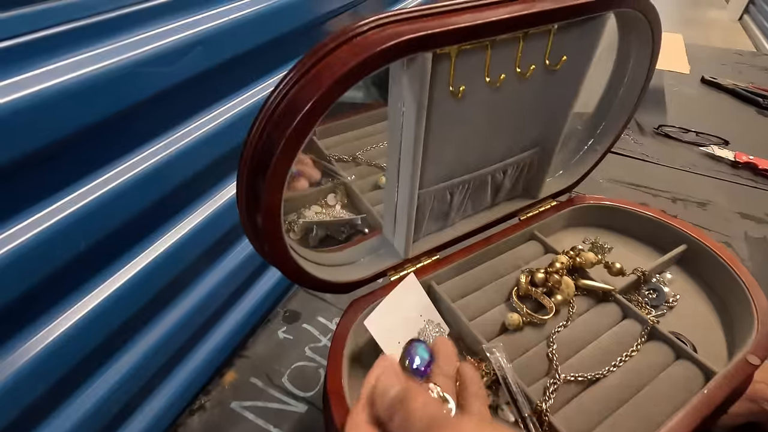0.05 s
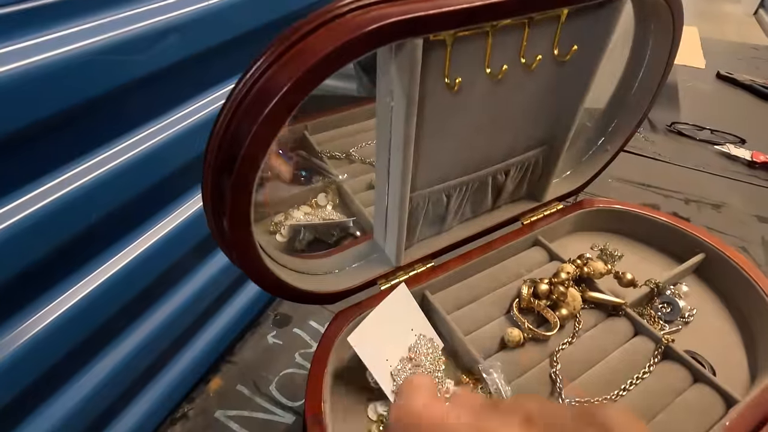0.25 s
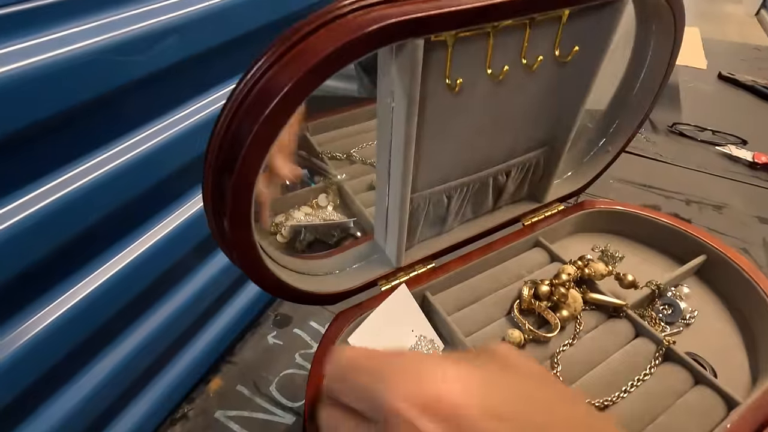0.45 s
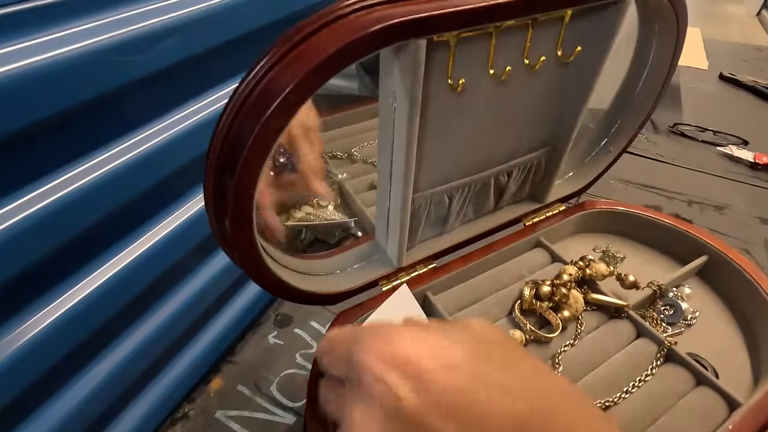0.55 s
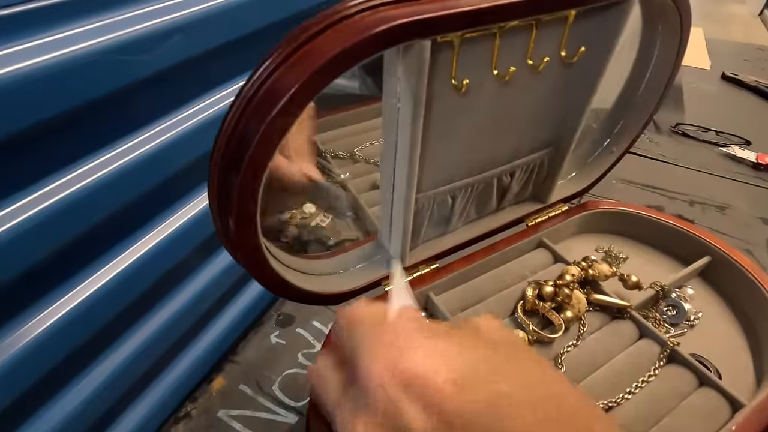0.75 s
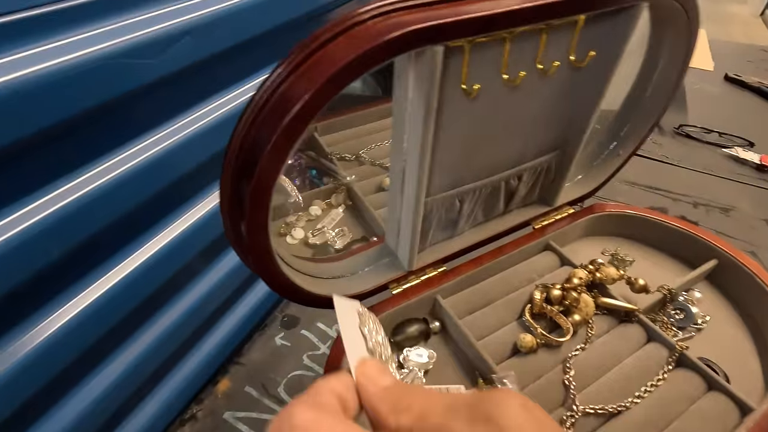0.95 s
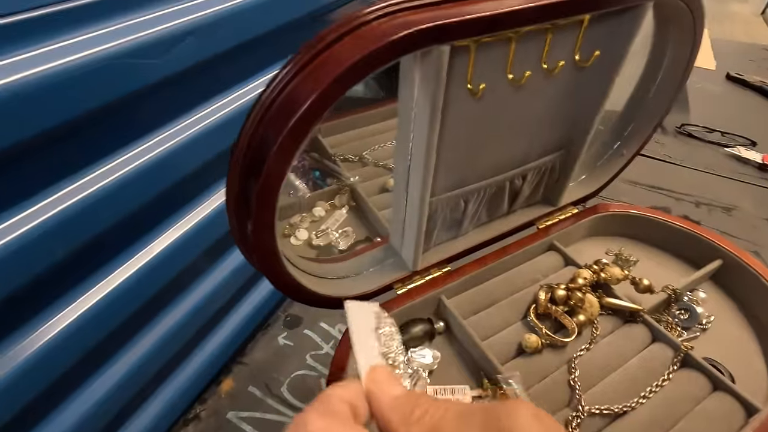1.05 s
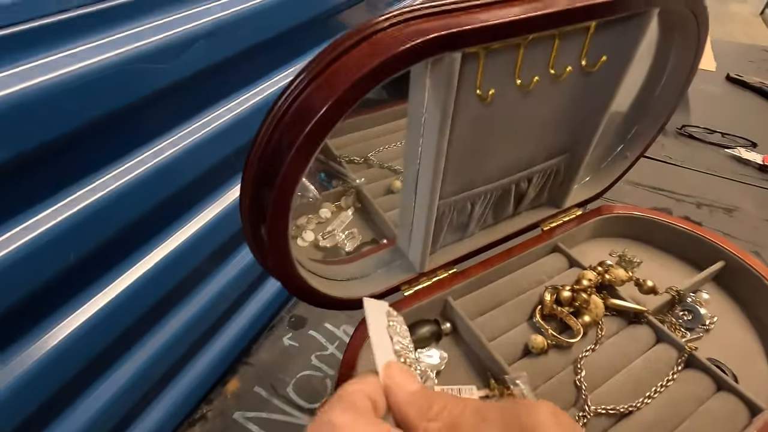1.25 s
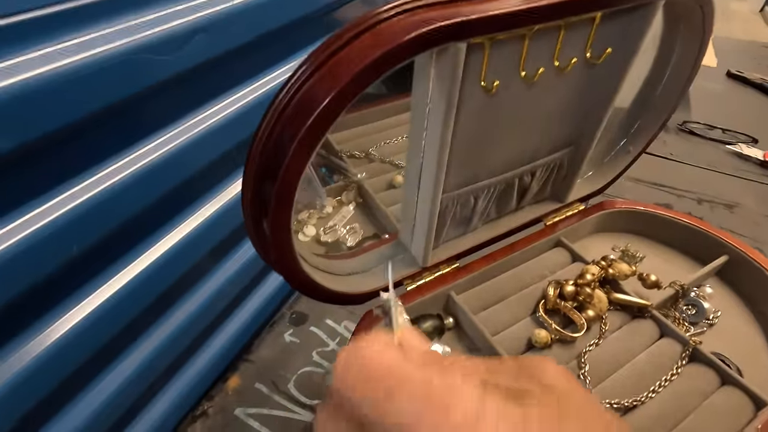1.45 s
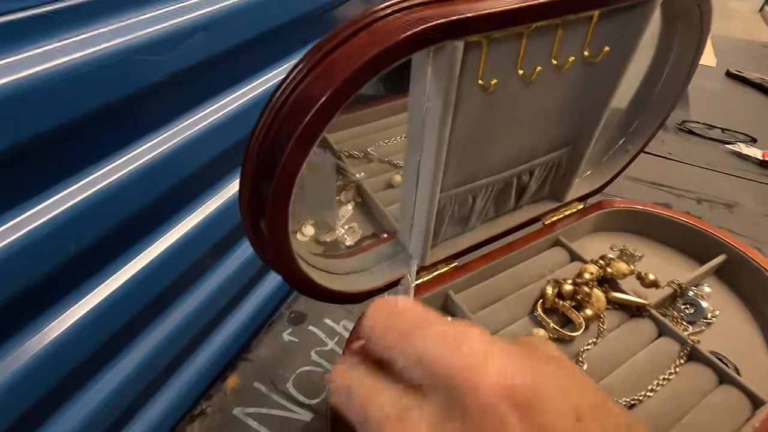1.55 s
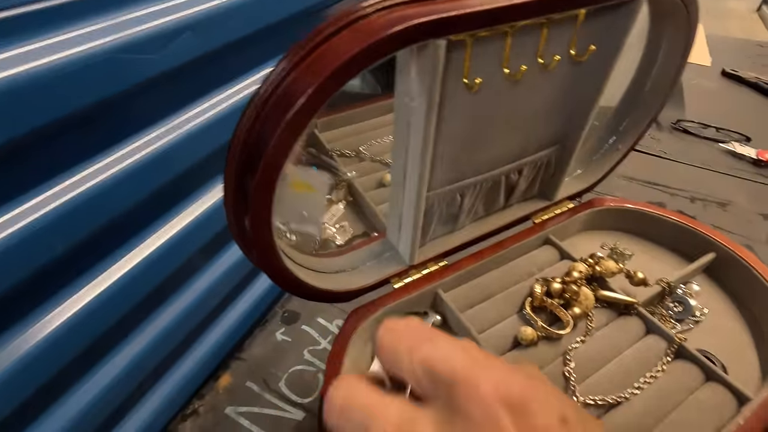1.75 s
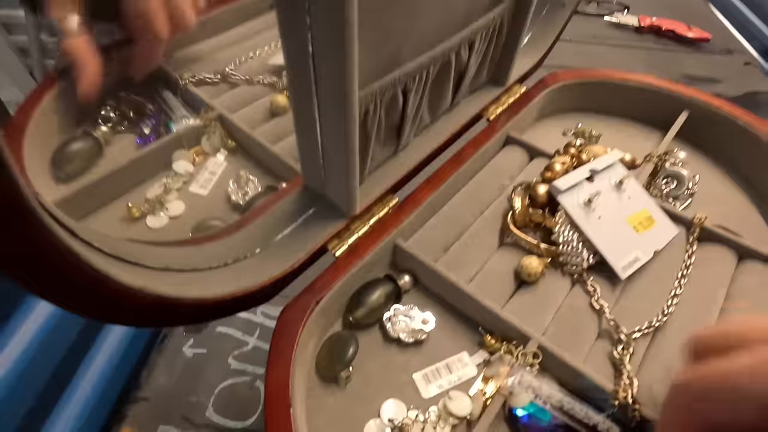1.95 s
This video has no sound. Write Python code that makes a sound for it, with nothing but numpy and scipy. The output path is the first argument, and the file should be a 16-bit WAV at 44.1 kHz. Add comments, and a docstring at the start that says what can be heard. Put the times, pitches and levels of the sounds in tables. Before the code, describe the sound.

Small beads, earrings and fine chains clatter and trickle against a wooden box, then quieten to faint scrapes

```python
"""In a small dry room, a hand sorts costume jewelry in a wooden box close to the microphone.
Knocks ring the box modes and a noise rattle; beads and earrings click as noise ticks with short rings.
Fine chain trickles as a swarm of link pings; filtered noise is the hand brushing the box.
An earring card scrapes along a divider in tiny slips with a thin rubbing note.
A faint low hum swells under the quiet air of the room, and a faint thin tone joins it."""
import sys
import numpy as np
from scipy import signal
from scipy.fft import rfft, irfft
from scipy.io import wavfile
from scipy.ndimage import uniform_filter1d

SR = 44100
rng = np.random.default_rng(int(sys.argv[2]) if len(sys.argv) > 2 else 0)


def pcm_store(signal):
    """Save signal as 16-bit PCM."""
    levels = np.round(np.clip(np.atleast_2d(signal), -1, 1) * 32767)
    wavfile.write(sys.argv[1], SR, levels.astype(np.int16).T)


N = 88200  # two seconds
TOP_HZ = 16000  # upper limit of the link pitches and of the whole sound

# Modes of the box and its tray. Each row: frequency in Hz, level in dB, t60 in seconds.
BOX_MODES = [(83, -31, 0.044), (101.6, -19.5, 0.24), (163.2, -16, 0.27), (193.2, -17.5, .27),
             (238, -20, .13), (324, -8.5, 0.066), (374.6, -17, 0.13), (451, -7, 0.052), (499.3, -4.5, 0.16),
             (518.7, -10, 0.058), (628, -5.5, 0.04), (873, -7, 0.055), (1168, 1, 0.033),
             (1267, -5.5, 0.023), (1750, -4, 0.0306), (2035, -1, .014)]


def undb(db):
    """Decibels to gain."""
    return 10 ** (np.asarray(db) / 20)


def unit(x):
    """Scale to rms 1."""
    return x / np.sqrt(np.mean(x ** 2))


def fade(rows):
    """Gain over time from (s, dB) points."""
    times, db = np.array(rows).T
    return undb(np.interp(np.arange(N) / SR, times, db))


def at(points, hz):
    """Read (Hz, dB) points on a log-frequency axis."""
    f, db = np.array(points).T
    return np.interp(np.log(hz), np.log(f), db)


def bins(x):
    """Frequencies of a sound's spectrum, kept at 1 Hz or more for the logarithms."""
    return np.maximum(np.fft.rfftfreq(x.shape[-1], 1 / SR), 1)


def shape(x, db):
    """Minimum-phase filter with the given gain at each frequency."""
    size = x.shape[-1]
    cepstrum = irfft(np.log(undb(db)), size)
    # folding the cepstrum forward makes the filter causal
    cepstrum[1:size // 2] *= 2
    cepstrum[size // 2 + 1:] = 0
    return irfft(rfft(x) * np.exp(rfft(cepstrum)), size)


def colour(x, points):
    """Filter by (Hz, dB) points."""
    return shape(x, at(points, bins(x)))


def decay(t, t60):
    """Exponential fall of 60 dB in t60 seconds."""
    return np.exp(-np.log(1000) * t / t60)


def burst(t, t60, db):
    """Coloured noise with the energy of a decay that starts at 1."""
    env = decay(t, t60)
    noise = shape(rng.standard_normal(len(t)) * env, db)
    return unit(noise) * np.sqrt(np.mean(env ** 2))


def add(out, start_s, x):
    """Mix a sound in at its time."""
    i = max(int(start_s * SR), 0)
    out[..., i:i + x.shape[-1]] += x[..., :N - i]


def walk(rate):
    """Random drift of rms 1, smoothed twice over 1 / rate seconds."""
    k = int(SR / rate)
    smooth = uniform_filter1d(rng.standard_normal(N), k)
    return unit(uniform_filter1d(smooth, k))


def contacts(per_s, scatter_db):
    """Random tiny impacts of uneven size and either sign, rms 1."""
    size = undb(scatter_db * np.minimum(rng.exponential(size=N), 4))
    hits = rng.random(N) < per_s / SR
    return unit(hits * size * rng.choice([-1, 1], N))


def ports(mid, side):
    """Two microphone ports: a shared sound plus a separately drawn one, opposite in sign at each."""
    # Level of the opposed part at each frequency. Each row: frequency in Hz, gain in dB.
    opposed_gain = [(130, -23.5), (260, -11.5), (1000, -12), (2500, -6.5), (5000, -9), (8500, -20.5),
                    (12000, -4)]
    return mid + colour(side, opposed_gain) * np.array([[1], [-1]])


def background():
    """Coloured noise as room air, a low sine hum that wavers in pitch and level, a faint steady-pitched tone."""
    # Room air. Each row: frequency in Hz, density in dB per Hz.
    air_spectrum = [(15, -9.5), (27, 5.5), (55, -8.5), (90, -10), (170, -15), (300, -24.5), (600, -31.5),
                    (1500, -34.5), (2400, -50), (7300, -53), (15000, -67.5)]
    # Low hum. Each row: time in seconds, level in dB.
    hum_level = [(0, -84), (1.0, -69.5), (1.13, -59.5), (1.25, -53), (1.45, -53.5), (1.62, -63.5),
                 (1.70, -57), (1.93, -55.5), (2, -76)]
    # Faint thin tone. Each row: time in seconds, level in dB.
    tone_level = [(1.08, -100), (1.155, -71.5), (1.24, -76.5), (1.42, -94)]
    hum_hz, tone_hz = 79.8, 513  # the hum's centre, the tone's pitch
    waver, flutter_db = .08, 2  # rms drift: share of the hum's pitch, dB of its level
    air_db, side_db = -61, -5  # the opposed part is set against the shared part

    wandering_hz = hum_hz * (1 + waver * walk(40))
    hum = np.sin(2 * np.pi * np.cumsum(wandering_hz) / SR) * undb(flutter_db * walk(35))
    tone = np.sin(2 * np.pi * tone_hz * np.arange(N) / SR)
    mid, side = (unit(colour(rng.standard_normal(N), air_spectrum)) for _ in range(2))
    air = undb(air_db) * (mid + undb(side_db) * side * np.array([[1], [-1]]))
    return air + unit(hum) * fade(hum_level) + unit(tone) * fade(tone_level)


def links():
    """Tiny links of all sizes ping as decaying sines and scrape as random impacts."""
    # Chain links. Each row: frequency in Hz, gain in dB per Hz.
    link_spectrum = [(200, -16.5), (850, -14.5), (1250, 2), (2500, 1), (5000, -1.5), (8600, -2),
                     (9800, -14), (12500, -16), (15500, -39)]
    links_per_s, scatter_db = 3400, 3.5
    ping_t60_s, scrape_db = 0.0069, -1.5  # scrape level against the pings

    t = np.arange(SR // 100) / SR
    when, pitch, size = rng.random((int(links_per_s * N / SR), 3)).T[:, :, None]
    strength = undb(scatter_db * np.minimum(-np.log(size), 4))
    pings = strength * np.sin(2 * np.pi * TOP_HZ * pitch * t) * decay(t, ping_t60_s)
    # sum every ping at its own moment
    places = (when * N).astype(int) + np.arange(len(t))
    pings = np.bincount(places.ravel(), pings.ravel(), N)[:N]
    scrape = undb(scrape_db) * contacts(links_per_s, scatter_db)
    return unit(colour(unit(pings) + scrape, link_spectrum))


def chains():
    """The chains trickle in quick little surges while the fingers stir them."""
    # Stirring of the chains. Each row: time in seconds, level in dB.
    stir = [(0, -71), (.14, -76), (.16, -71.5), (.23, -74), (.31, -52), (.345, -37.5), (.385, -50.5),
            (.46, -62.5), (.53, -68), (.56, -67), (.612, -76), (.63, -34), (.65, -45.5), (.67, -35),
            (.70, -45.5), (.735, -37.5), (.765, -53), (.86, -59.5), (.91, -56), (.99, -66.5),
            (1.035, -53.5), (1.07, -66), (1.16, -84.5), (1.44, -90), (1.51, -76), (1.645, -78), (1.67, -63),
            (1.73, -62), (1.815, -53), (1.87, -62.5), (1.94, -72), (2, -64.5)]
    surge_db, surges_per_s = 1.6, 220  # rms depth, smoothing rate
    surge = unit(undb(surge_db * walk(surges_per_s)))
    return ports(links(), links()) * surge * fade(stir)


def beads():
    """Each small hard contact is a noise tick and the short ring of three close modes."""
    # Clicks of beads, earrings and card edges. Each row: start in seconds, tick level in dB,
    # treble tilt in dB per octave, ring frequency in Hz, ring level in dB, tick t60 in seconds.
    clicks = [(0.073, -50.5, -2, 5160, -57, 0.012), (0.0912, -50.5, 11.5, 6550, -52, 0.018),
              (0.2476, -25.5, 1, 6720, -29, 0.013), (.2785, -30.5, -4, 7330, -33, 0.019),
              (0.3138, -19.5, -1, 3790, -25, 0.0096), (0.3148, -27, -19, 5900, -21, 0.023),
              (0.324, -36, -19, 6550, -43, 0.015), (0.335, -31, -9.5, 2560, -41.5, 0.0098),
              (0.3452, -21, 3, 6840, -28, 0.011), (0.3525, -25, -6.5, 3640, -31, 0.007),
              (0.354, -22.5, -16, 1615, -21.5, 0.023), (0.369, -33, 3, 3730, -37, 0.014),
              (0.3752, -28, 1, 4880, -34, 0.0098), (.3790, -35, 7, 3600, -38, 0.01),
              (0.388, -37, -2, 4860, -36, 0.011), (0.3982, -24.5, 2.5, 7380, -29, 0.01),
              (0.4135, -30, -0.5, 7100, -47, 0.0092), (0.425, -26.5, -7, 2710, -30, 0.013),
              (.4258, -52, 1, 4910, -29, 0.011), (0.4323, -40, -2, 1643, -32, 0.014),
              (0.444, -49, 4, 6700, -56, 0.0097), (0.4718, -23, -1, 4840, -25.5, 0.0092),
              (0.4858, -45.5, -7, 4940, -56, 0.013), (0.544, -54, -8, 1734, -53, .04),
              (0.6199, -46, -7, 5860, -51, .01), (0.6259, -33.5, -3.5, 3920, -28, 0.051),
              (0.6317, -46, -13, 1420, -33.5, 0.022), (.6605, -46, 8, 1500, -37, .012),
              (0.6643, -22.5, 0, 2640, -23.5, 0.0075), (.6660, -28.5, 20, 1284, -28, 0.026),
              (0.6721, -34, -6, 1428, -22.5, 0.014), (0.679, -35, -6, 5950, -36, 0.012),
              (0.6903, -31.5, -10, 1460, -28, 0.058), (0.7005, -34.5, -12, 1300, -26, 0.097),
              (0.713, -43, 1.5, 7800, -30.5, 0.012), (0.718, -28.5, 2.5, 5350, -42, 0.028),
              (0.7233, -34.5, -13, 7650, -22, 0.039), (0.7353, -19.5, -3.5, 7130, -22, 0.012),
              (0.7386, -36.5, -25.5, 3500, -26.5, 0.024), (0.7463, -35, 3.5, 7440, -27.5, 0.0075),
              (0.789, -36.5, -7, 7975, -28.5, 0.011), (0.7917, -38, 6, 8080, -26, 0.017),
              (.7990, -30, 0.5, 8000, -37, 0.007), (.8245, -44, 0.5, 6610, -47, .01),
              (0.835, -38, 3.5, 5410, -37.5, 0.026), (0.851, -44.5, -2, 5870, -41, 0.022),
              (.870, -47.5, -7, 5140, -48, 0.042), (0.8912, -38, 1.5, 6040, -41, 0.024),
              (0.896, -40, 3, 5330, -40, 0.016), (1.0005, -52, 9, 4370, -47.5, 0.015),
              (1.0128, -51.5, -1.5, 3880, -44, 0.027), (1.0202, -44, -3, 5900, -52, 0.0085),
              (1.0249, -42, -9.5, 4870, -43, 0.018), (1.035, -41.5, 1.5, 5420, -51, 0.013),
              (1.0454, -44, 1.5, 7660, -61, 0.021), (1.052, -43, -5.5, 6120, -45, 0.017),
              (1.0874, -51.5, 1, 4700, -55, 0.022), (1.5003, -55.5, -10, 5000, -69.5, .02),
              (1.518, -57.5, 2, 6500, -57.5, 0.014), (1.6579, -41.5, 8.5, 5450, -42.5, 0.023),
              (1.681, -53, -5, 1390, -46.5, 0.014), (1.7032, -47.5, 2, 1410, -43.5, 0.015),
              (1.716, -43.5, 4, 1490, -41.5, 0.059), (1.7401, -41, -0.5, 2200, -34.5, 0.007),
              (1.7659, -39.5, 3, 3190, -36.5, 0.022), (1.797, -37.5, 10, 6200, -46, 0.0089),
              (1.802, -41, 3, 1190, -50, 0.0085), (1.8135, -50, 6, 1413, -34, 0.011),
              (1.814, -38, -4, 2020, -40, 0.011), (1.8211, -40.5, -13, 1063, -38.5, 0.018),
              (1.8502, -46.5, -9.5, 1260, -59, 0.019), (1.8830, -48.5, -16, 1420, -73, 0.034),
              (1.898, -56, 3, 3170, -52, 0.0097), (1.907, -50.5, -11, 1100, -52.5, 0.027)]
    # Contact tick of small hard pieces. Each row: frequency in Hz, density in dB per Hz.
    tick_spectrum = [(200, -25.5), (800, -12.5), (1400, -8.5), (2500, 1), (5000, 6.5), (8500, 3.5),
                     (9800, -10.5), (12500, -17.5), (15500, -34)]
    tilt_hz, spread = 4560, 0.054  # pivot of the tilt, typical mode spacing as a share of the ring pitch
    ring_cycles, ring_min_s = 20, 0.013  # ring t60: this many cycles on top of the minimum
    rise_share = .035  # rise time constant as a share of the tick t60

    out, t = np.zeros((2, N)), np.arange(SR // 10) / SR
    f = bins(t)
    octaves = np.clip(np.log2(f / tilt_hz), -2, 1)
    for start, tick_db, tilt_db, ring_hz, ring_db, t60 in clicks:
        spectrum = at(tick_spectrum, f) + tilt_db * octaves
        tick = ports(*(burst(t, t60, spectrum) for _ in range(2)))
        hz = ring_hz * (1 + spread * np.array([-1, 0, 1]) * rng.uniform(0.45, 1.6, size=3))
        modes = np.array([.5, 1, .5]) @ np.sin(2 * np.pi * hz[:, None] * t)
        ring = modes * decay(t, ring_min_s + ring_cycles / ring_hz)
        rise = 1 - np.exp(-t / (rise_share * t60))  # longer ticks also rise more slowly
        add(out, start, (undb(tick_db) * tick + undb(ring_db) * ring) * rise)
    return out


def box():
    """Each knock rings the box and shakes its contents; soft contacts lose the high modes."""
    # Knocks on the box. Each row: start in seconds, level in dB, contact cut-off in Hz,
    # bass boost in dB, centre of the boost in Hz.
    knocks = [(.2258, -47.5, 1980, 12.5, 91.2), (.2365, -34, 2010, 1, 90), (.2474, -14, 2620, -9.5, 125),
              (.2745, -26, 1480, -4.5, 89.7), (.2795, -24.5, 1710, 10, 162.5), (.3150, -32, 600, 11, 95.2),
              (.3245, -31, 298, 15.5, 160), (.3540, -30, 2450, 13.5, 166), (.3650, -36, 450, 7, 95),
              (.3990, -34, 600, 6.5, 100), (.4308, -22, 540, 2.5, 212.7), (.6640, -42, 1470, 1.5, 100),
              (0.7104, -29, 550, 8, 217), (.7370, -37.5, 750, 11.5, 200), (.7640, -40, 557, 13, 200),
              (1.206, -65, 1405, -12.5, 90.1), (1.768, -42, 196, 6.5, 177), (1.815, -45, 175, 10.5, 161),
              (1.958, -58, 600, 28, 120)]
    # Rattle of the contents under a knock. Each row: frequency in Hz, density in dB per Hz.
    thud = [(40, -6.5), (100, -5.5), (300, 0), (700, 9), (1300, -2), (2100, -13.5), (2700, -20),
            (6000, -48.5)]
    bass_octaves, contact_slope = 0.44, 7.9  # half width of the boost, exponent of the cut-off
    thud_db, thud_t60_s = -6.5, 0.061
    grip_detune, strike_scatter_db = .012, 1.2  # rms share of pitch, rms dB per mode

    out, t = np.zeros((2, N)), np.arange(SR // 2) / SR
    f = bins(t)
    hz, db, t60 = np.array(BOX_MODES).T
    sign = (-1) ** (np.arange(len(hz)) // 2)  # pairs of modes swing against each other

    def push_db(at_hz, contact_hz, bass_db, bass_hz):
        """Spectrum of the push: a bass boost and the softness of the contact."""
        boost = bass_db / (1 + (np.log2(at_hz / bass_hz) / bass_octaves) ** 2)
        return boost - 10 * np.log10(1 + (at_hz / contact_hz) ** contact_slope)

    for start, level_db, *push in knocks:
        # grip shifts the modes, the spot struck changes their levels
        grip, spot = rng.standard_normal((2, len(hz)))
        mode_hz = hz * (1 + grip_detune * grip)
        rings = np.sin(2 * np.pi * mode_hz[:, None] * t) * decay(t, t60[:, None])
        strength = sign * undb(db + push_db(hz, *push) + strike_scatter_db * spot)
        rattle = ports(*(burst(t, thud_t60_s, at(thud, f)) for _ in range(2)))
        rattle = shape(rattle, push_db(f, *push))
        add(out, start, undb(level_db) * (strength @ rings + undb(thud_db) * rattle))
    return out


def hand():
    """The hand rubs the box: noise through its damped modes keeps the low ones rumbling."""
    # Hand bumping and brushing along the box. Each row: time in seconds, level in dB.
    brush = [(.245, -95), (.27, -41), (.335, -31), (.39, -42.5), (.42, -48.5), (.50, -51), (.53, -61),
             (.55, -55.5), (.60, -62), (.66, -45.5), (.73, -46.5), (.80, -50.5), (.86, -62), (.95, -63),
             (1.1, -75), (1.3, -92), (1.5, -73.5), (1.7, -74), (1.85, -66.5), (1.93, -65.5), (2, -54)]
    # Rubbing force. Each row: frequency in Hz, gain in dB per Hz.
    rub_force = [(30, -4.5), (100, 6.5), (165, 2.5), (230, -3.5), (330, -10.5), (500, -17.5), (900, -25),
                 (3000, -52)]
    damping_hz = 12  # widening of the modes under the hand

    f = bins(np.zeros(N))[:, None]
    hz, db, t60 = np.array(BOX_MODES).T
    width = np.log(1000) / (2 * np.pi * t60) + damping_hz
    power = undb(db) ** 2 / ((f - hz) ** 2 + width ** 2)
    body_db = 10 * np.log10(power.sum(axis=1))
    rumble = colour(shape(rng.standard_normal(N), body_db), rub_force)
    return unit(rumble) * fade(brush)


def card():
    """The sliding card catches and slips in tiny impacts and rubs with a thin note of narrow noise."""
    # Pressure of the sliding card. Each row: time in seconds, level in dB.
    slide = [(1.43, -90), (1.49, -71), (1.63, -74), (1.67, -57), (1.72, -54.5), (1.78, -52), (1.82, -52.5),
             (1.85, -57), (1.91, -64), (1.935, -67.5), (2, -60.5)]
    # Resonance of the card. Each row: frequency in Hz, gain in dB per Hz.
    card_spectrum = [(200, -16.5), (750, -13), (1100, 2), (1500, -1.5), (2000, -11), (3200, -14.5),
                     (6000, -37)]
    # Thin rubbing note. Each row: time in seconds, level in dB.
    rub = [(1.43, -95.5), (1.50, -74.5), (1.62, -73.5), (1.69, -61.5), (1.76, -47), (1.80, -87)]
    rub_hz, rub_width_hz = 1520, 190
    slips_per_s, slip_scatter_db = 900, 1.5
    catch_db, catches_per_s = 2.5, 130  # rms depth, smoothing rate

    noise = rng.standard_normal(N)
    note = shape(noise, -20 * np.log10(1 + (2 * (bins(noise) - rub_hz) / rub_width_hz) ** 2))
    catch = undb(catch_db * walk(catches_per_s))
    slips = colour(contacts(slips_per_s, slip_scatter_db) * catch, card_spectrum)
    return unit(slips) * fade(slide) + unit(note * catch) * fade(rub)


def reflections(x, t60, delay_s):
    """A diffuse noise tail of unit energy whose treble dies first."""
    treble_hz, treble_t60_s = 2000, .17
    t = np.arange(SR // 2) / SR
    noise = rng.standard_normal(len(t))
    low = signal.sosfiltfilt(signal.butter(2, treble_hz, fs=SR, output="sos"), noise)
    tail = low * decay(t, t60) + (noise - low) * decay(t, treble_t60_s)
    tail *= t >= delay_s
    return signal.fftconvolve(x, tail / np.linalg.norm(tail))[:N]


def scene():
    """The handling sounds in a small dry room, over its background."""
    # How much the room differs between the ports. Each row: frequency in Hz, gain in dB.
    room_width = [(120, -18), (500, -4.5), (1500, -2)]
    room_db, room_t60_s, room_delay_s = -15.5, 0.22, 0.0081

    quiet = background()
    near = chains() + beads() + box() + hand() + card()
    mono = near.mean(axis=0)
    room = np.array([reflections(mono, room_t60_s, room_delay_s) for _ in range(2)])
    shared = room.mean(axis=0)
    room = colour(room - shared, room_width) + shared
    return near + undb(room_db) * room + quiet


def record(dry):
    """The two ports differ in colour and the left one hears slightly later; the top is cut."""
    # Left port over right. Each row: frequency in Hz, difference in dB.
    left_bias = [(130, 0), (260, -2.5), (1000, -.7), (5000, -.4), (8500, 1.5), (12000, 7)]
    lag_s = 1.2e-5
    f = bins(dry)
    # each port takes half of the level difference and half of the lag
    half = undb(at(left_bias, f) / 2) * np.exp(-1j * np.pi * f * lag_s)
    heard = irfft(rfft(dry) * np.array([half, 1 / half]), N)
    return signal.sosfilt(signal.ellip(8, .2, 70, TOP_HZ, fs=SR, output="sos"), heard)


dry = scene()
out = record(dry)
pcm_store(out)
```